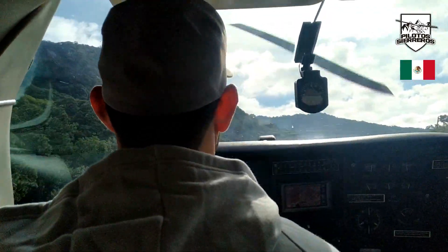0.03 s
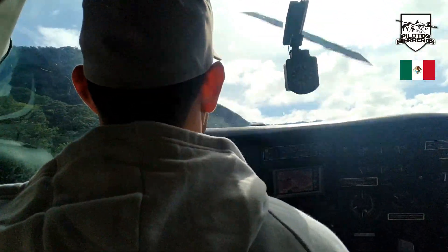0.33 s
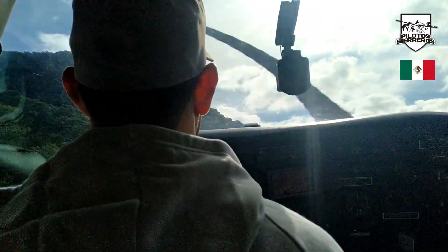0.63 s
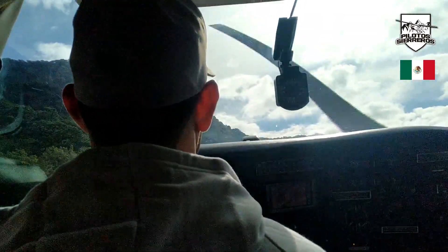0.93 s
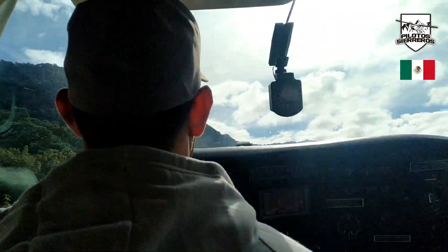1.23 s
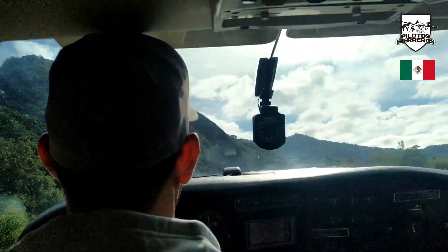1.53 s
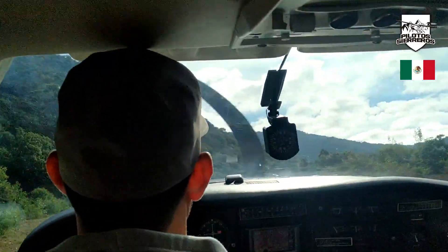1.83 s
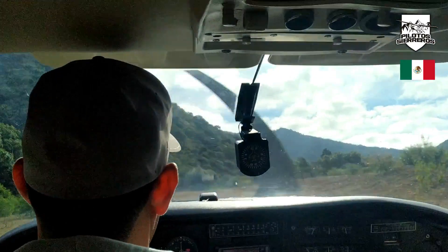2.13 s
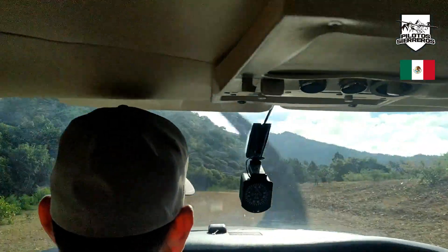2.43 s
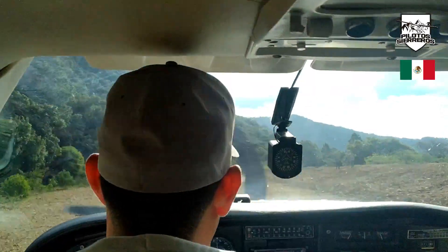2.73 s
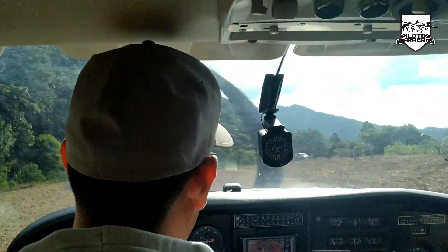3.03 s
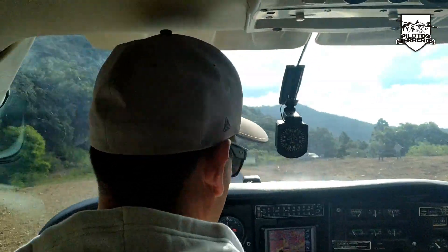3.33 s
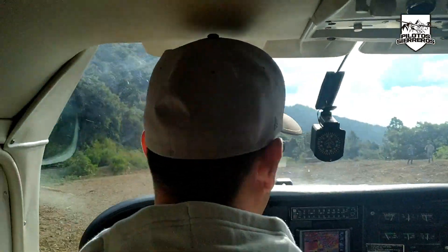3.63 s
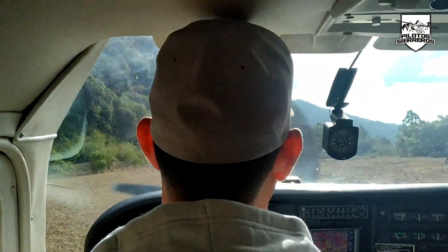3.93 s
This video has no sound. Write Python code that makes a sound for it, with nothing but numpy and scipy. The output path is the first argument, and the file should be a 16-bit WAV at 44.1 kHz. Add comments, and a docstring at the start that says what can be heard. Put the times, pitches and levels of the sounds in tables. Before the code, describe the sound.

A small propeller plane lands on dirt, heard from behind the pilot. The engine drones and drops to idle, the tyres scuff, and the cabin rumbles and thumps, with air hiss, grit sprays and faint metallic jingling.

```python
"""Inside a small propeller plane landing on a dirt strip. At first the engine drones on multiples of its
shaft rate, over the rumble of the airframe and the hiss of passing air. It is throttled back to idle, and
grit begins to spray against the skin. After a second the wheels meet the ground: the tyres scuff, the
undercarriage thumps, the cabin booms and shudders, and a loose metal fitting jingles on to the end.
A limiter holds the heavy bass down."""
import sys
import numpy as np
from scipy import signal
from scipy.fft import rfft, irfft
from scipy.io import wavfile
from scipy.ndimage import uniform_filter1d, minimum_filter1d

SR = 44100
rng = np.random.default_rng(int(sys.argv[2]) if len(sys.argv) > 2 else 0)


def generate_wav(signal):
    """Clip the signal to [-1, 1] and save it as 16-bit WAV at the path in sys.argv[1]."""
    frames = np.transpose(np.atleast_2d(signal))
    scaled = np.clip(frames, -1, 1) * 32767
    pcm = np.round(scaled).astype(np.int16)
    wavfile.write(sys.argv[1], SR, pcm)


N = 176400
T = np.arange(N) / SR


def from_db(db):
    """Decibels to amplitude ratio."""
    return 10 ** (np.asarray(db) / 20)


def unit_rms(x):
    """Normalisation to an rms of 1."""
    return x / np.sqrt(np.mean(x ** 2) + 1e-20)


def in_time(rows):
    """Linear interpolation of each column over time."""
    s, *columns = np.transpose(rows)
    return [np.interp(T, s, c) for c in columns]


def colour(x, spectrum):
    """Spectral shaping by one column, or left and right, falling away beyond the table's ends; rms 1."""
    hz, *columns = np.transpose(spectrum)
    log_f = np.log(np.maximum(np.fft.rfftfreq(N, 1 / SR), 1))
    outside = log_f - np.clip(log_f, np.log(hz[0]), np.log(hz[-1]))
    db = np.array([np.interp(log_f, np.log(hz), c) for c in columns]) - 40 * np.abs(outside)
    return unit_rms(irfft(rfft(x) * from_db(db), N))


def noise(correlation):
    """White stereo noise with the given left-right correlation."""
    mid, side = rng.standard_normal((2, N))
    return np.sqrt(1 + correlation) * mid + np.sqrt(1 - correlation) * np.array([side, -side])


def drift(hz):
    """Low-passed noise: a random wander of rms 1."""
    f = np.fft.rfftfreq(N, 1 / SR)
    return unit_rms(irfft(rfft(rng.standard_normal(N)) / (1 + (f / hz) ** 2), N))


def steady(x, span_s):
    """Division by the running rms evens out swings slower than the span."""
    size = int(span_s * SR)
    power = uniform_filter1d(uniform_filter1d(np.mean(x ** 2, axis=0), size), size)
    return x / np.sqrt(power + 1e-12)


def swell(centre_s, length_s):
    """A Gaussian envelope of height 1."""
    return np.exp(-2 * ((T - centre_s) / length_s) ** 2)


# The engine slows. Each row: time in seconds, shaft rate in Hz.
SHAFT_RATE = [(0, 55.4), (.33, 55.6), (.45, 52.9), (.75, 45.9), (1.04, 41.6), (1.22, 39.5), (2.5, 39.7),
              (4, 38.5)]
# The drone. Each row: time in seconds, levels of shaft orders 1, 2 and 3 in dB.
MAIN_ORDERS = [(0, -23, -9.5, -13.5), (.32, -28, -10, -14.5), (.45, -16, -10, -36), (.7, -15.5, -7.5, -30),
               (1.04, -12, -10.5, -17), (1.1, -19, -12, -12.5), (1.23, -16, -5.5, -30),
               (1.45, -13, -18, -26), (2.05, -17, -14, -29), (2.6, -24, -9.5, -25), (2.9, -25, -19.5, -28),
               (4, -26, -14.5, -23)]
# Weaker tones. Each row: multiple of the shaft rate, level under power in dB.
WEAK_ORDERS = [(1.5, -23.5), (2.5, -28.5), (3.5, -46), (4, -32), (4.5, -49), (6, -43.5), (10, -48.5),
               (10.5, -43)]


def engine():
    """Periodic excitation: propeller and exhaust sound at orders of the shaft rate, each a bit uneven."""
    shaft_hz, = in_time(SHAFT_RATE)
    angle = 2 * np.pi * np.cumsum(shaft_hz * (1 + 0.0041 * drift(hz=10.8))) / SR
    throttle_db = np.interp(T, [0.25, 0.5], [0, -4])
    orders = list(enumerate(in_time(MAIN_ORDERS), 1))
    orders += [(order, db + throttle_db) for order, db in WEAK_ORDERS]
    out = 0
    for order, db in orders:
        amplitude = np.sqrt(2) * from_db(db + 2 * drift(hz=12.6))
        out += amplitude * np.sin(order * angle + rng.uniform(0, 2 * np.pi))
    return out


# The rumble. Each row: time in seconds, levels of frame shudder, cabin boom and panels in dB.
RUMBLE_LEVELS = [(0, -17.5, -20.5, -30), (.4, -23, -18, -27.5), (.9, -11, -20.5, -30),
                 (1.1, -14.5, -14, -23), (1.35, -18, -11, -28), (1.57, -12, -16.5, -33),
                 (1.72, -17, -10.5, -24.5), (2.0, -14, -12, -29.5), (2.2, -15, -10.5, -28),
                 (2.45, -10.5, -13.5, -27.5), (2.65, -7.5, -10.5, -27), (2.95, -11, -10.5, -30),
                 (3.25, -16.5, -10.5, -29.5), (3.5, -10, -10.5, -29.5), (4, -9.5, -11.5, -27.5)]
# Spectra of these three. Each row: frequency in Hz, relative density in dB.
SHUDDER_SPECTRUM = [(10, -30), (18, -5), (26, -6), (36, -6), (48, -3), (60, -12.5), (90, -36)]
BOOM_SPECTRUM = [(40, -38), (60, -11), (78, -2.5), (100, -3), (130, -1.5), (170, -9), (210, -11.5),
                 (250, -24), (400, -37)]
PANEL_SPECTRUM = [(150, -22), (230, 1), (290, -2.5), (340, -2), (420, -9), (540, -10.5), (700, -18.5),
                  (1000, -24.5), (1600, -30.5), (3000, -42)]
# Undercarriage thumps. Each row: centre in seconds, peak level in dB.
THUMPS = [(1.09, -25.5), (1.26, -28), (1.69, -24), (1.99, -19.5), (2.58, -23.5), (2.68, -24.5), (3.05, -27),
          (3.22, -24.5)]


def airframe():
    """Forced vibration: rough ground shakes the frame, booms in the cabin and thumps through panels."""
    shudder_db, boom_db, panel_db = in_time(RUMBLE_LEVELS)
    shudder = from_db(shudder_db) * steady(colour(noise(1.0), SHUDDER_SPECTRUM), span_s=0.18)
    boom = from_db(boom_db) * steady(colour(noise(0.96), BOOM_SPECTRUM), span_s=0.078)
    shaking = from_db(panel_db + 1.1 * drift(hz=16))
    thumps = sum(from_db(db) * swell(s, length_s=0.035) for s, db in THUMPS)
    panels = steady(colour(noise(0.83), PANEL_SPECTRUM), span_s=0.06)
    return shudder + boom + np.hypot(shaking, thumps) * panels   # the envelopes add in power


# The hiss. Each row: time in seconds, relative levels of the treble and the middle in dB.
RUSH_LEVELS = [(0.0, -36.5, -38.5), (0.67, -33, -35), (0.82, -36.5, -39), (0.97, -32, -33.5),
               (1.32, -34.5, -40), (1.34, -35, -37.5), (1.92, -33, -38.5), (1.94, -37, -41.5),
               (2.02, -27, -32.5), (2.04, -34, -37.5), (2.16, -35, -37.5), (2.43, -31.5, -37.5),
               (2.54, -35.5, -39.5), (2.57, -29.5, -35), (2.63, -38, -39), (2.65, -30.5, -33),
               (2.8, -35, -39.5), (2.91, -28.5, -32), (2.94, -36.5, -39), (3.34, -33, -39.5),
               (3.36, -29.5, -34), (3.42, -35.5, -39.5), (3.45, -31.5, -36.5), (3.52, -37.5, -40.5),
               (3.69, -32.5, -37.5), (3.99, -35, -38), (4.0, -35, -34)]
# Spectra of the two bands. Each row: frequency in Hz, relative density left and right in dB.
MIDDLE_SPECTRUM = [(453, -2, -6), (900, -1.5, -4), (1310, -2, -5.5), (2020, -1, -7.5), (2970, -2, -8.5),
                   (4120, -5.5, -11), (5600, -15, -14), (8000, -34, -32)]
TREBLE_SPECTRUM = [(2500, -34, -34), (4400, -8.5, -16.5), (6040, -3, -11.5), (7050, -1.5, -9),
                   (7500, 1, -7.5), (8270, -2, 0), (8860, -2, -7), (9550, -5.5, -11.5), (10900, -8.5, -18),
                   (12500, -11, -23), (14200, -17, -28)]


def air_rush():
    """Flow noise: air and dust hiss along the cabin, the sides nearly uncorrelated, the left louder."""
    treble_db, middle_db = in_time(RUSH_LEVELS)
    flicker = drift(hz=23)
    middle = from_db(middle_db + 5 + 1.19 * flicker) * colour(noise(-0.1), MIDDLE_SPECTRUM)
    treble = from_db(treble_db + 3 + 0.85 * flicker) * colour(noise(0), TREBLE_SPECTRUM)
    return middle + treble


# Sprays of grit. Each row: time of the peak in seconds, peak level in dB.
SPRAYS = [(.535, -27.5), (.96, -30), (1.087, -28), (1.39, -23), (1.522, -25), (1.605, -29), (1.825, -25),
          (2.02, -24), (2.273, -23), (2.325, -19.5), (2.385, -32), (2.455, -23), (2.58, -29), (2.65, -23),
          (2.678, -27), (2.848, -27), (2.903, -24), (3.065, -26), (3.38, -28), (3.45, -25), (3.699, -19.5)]
# Grit on the skin. Each row: frequency in Hz, relative density left and right in dB.
GRIT_SPECTRUM = [(600, -20, -23), (1500, -8.5, -11), (3500, -7.5, -13), (5500, -3.5, -11), (7500, 2.5, -3),
                 (8300, 2, -1), (10000, -4, -12), (14000, -13.5, -27)]


def grit(rise_s=0.0063, fall_s=0.0096, grains_per_s=3000, spread_db=5):
    """Shot noise: each spray is a quick swell of tiny random impacts."""
    envelope = sum(from_db(db) * np.exp(-np.maximum((s - T) / rise_s, (T - s) / fall_s))
                   for s, db in SPRAYS)
    sizes = from_db(spread_db * np.minimum(rng.exponential(1, (2, N)), 4))
    signs = rng.choice([-1, 1], (2, N))
    impacts = rng.random((2, N)) < grains_per_s / SR
    return envelope * colour(sizes * signs * impacts, GRIT_SPECTRUM)


# Scuffs at touchdown. Each row: centre in seconds, length in seconds, peak level in dB.
SCUFFS = [(1.116, 0.21, -33), (1.36, 0.078, -31.5), (1.474, .13, -31.5), (1.713, 0.19, -30.5),
          (1.85, 0.089, -34.5)]
# Tyre on dirt. Each row: frequency in Hz, relative density in dB.
SCUFF_SPECTRUM = [(250, -18), (400, -7), (550, 2.5), (750, -4), (1100, -7.5), (1500, -25), (3000, -40)]


def tyres():
    """Sliding friction: short juddering scuffs as the wheels take the weight."""
    contact = sum(from_db(db) * swell(s, length_s) for s, length_s, db in SCUFFS)
    judder = from_db(1.3 * drift(hz=40))
    return contact * judder * colour(noise(0.38), SCUFF_SPECTRUM)


# Modes of the fitting. Each row: frequency in Hz, relative level in dB, time to decay by 60 dB in
# seconds, left minus right in dB.
FITTING_MODES = [(4525, -45, 0.13, 1), (5210, -47.5, 0.074, 4), (7320, -44, 0.074, 7),
                 (8840, -46, 0.064, 6), (11360, -48, 0.18, 7.5), (13717, -52, 0.09, 10)]


def loose_fitting(taps_per_s=28, spread_db=9):
    """Damped resonance: once the wheels roll, random taps ring the metal, each mode by its own amount."""
    rolling = np.interp(T, [1.0, 2.16], [0, 1])
    taps = (rng.random(N) < taps_per_s / SR) * rolling
    out = 0
    for hz, db, t60, pan_db in FITTING_MODES:
        radius, angle = from_db(-60 / (t60 * SR)), 2 * np.pi * hz / SR   # the resonator's pole
        hits = taps * from_db(spread_db * np.clip(rng.standard_normal(N), -2, 2))
        ring = signal.lfilter([0, 1], [1, -2 * radius * np.cos(angle), radius ** 2], hits + 1e-18)
        out += unit_rms(ring) * from_db([[db + pan_db / 2], [db - pan_db / 2]])
    return from_db(-7) * out


def scene():
    """Superposition of all sources at the seat behind the pilot."""
    bass = (engine() + airframe()) * from_db([[-0.3], [0.3]])   # slightly to the right
    return bass + air_rush() + grit() + tyres() + loose_fitting()


def record(dry):
    """Peak limiting: the whole sound ducks on bass peaks; a low-pass filter then cuts the top."""
    ceiling, release_db_per_s, lookahead_s, cutoff_hz = 0.92, 108, 0.0036, 14250
    over_db = 20 * np.log10(np.maximum(np.abs(dry).max(axis=0) / ceiling, 1))
    release_db = release_db_per_s * T
    held_db = np.maximum.accumulate(over_db + release_db) - release_db
    size = int(lookahead_s * SR)
    gain_db = uniform_filter1d(minimum_filter1d(-held_db, size), size)
    low_pass = signal.ellip(12, 0.1, 80, cutoff_hz, fs=SR, output="sos")
    return signal.sosfilt(low_pass, dry * from_db(gain_db))


dry = scene()
out = record(dry)
generate_wav(out)
```